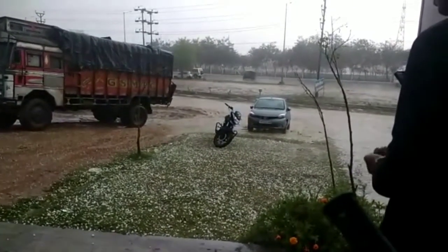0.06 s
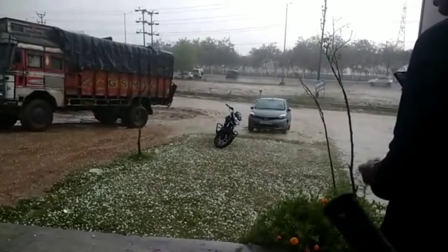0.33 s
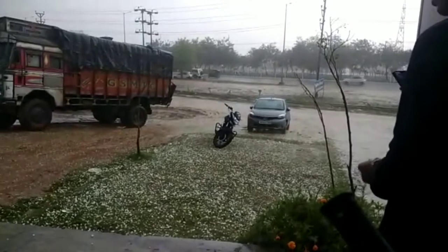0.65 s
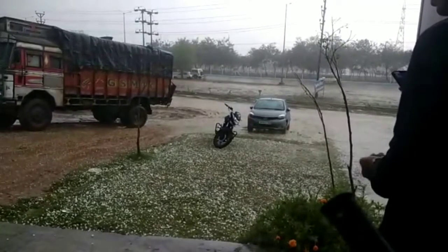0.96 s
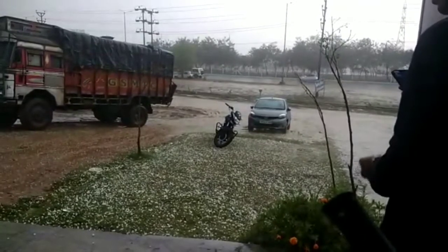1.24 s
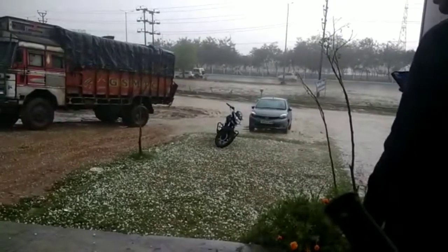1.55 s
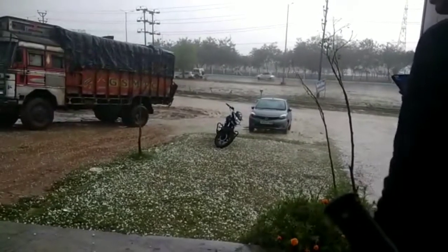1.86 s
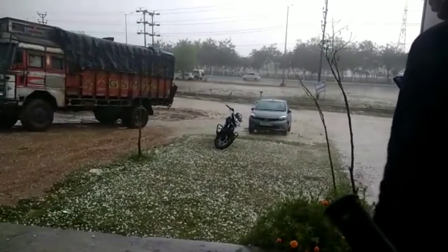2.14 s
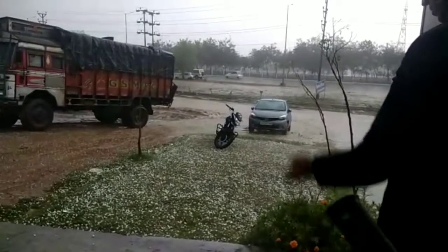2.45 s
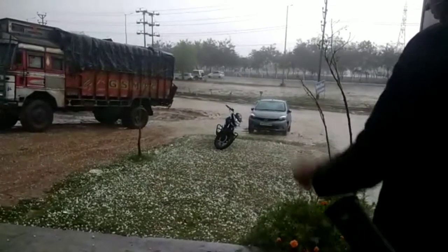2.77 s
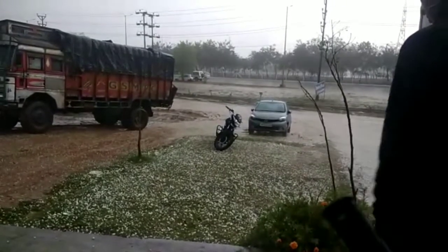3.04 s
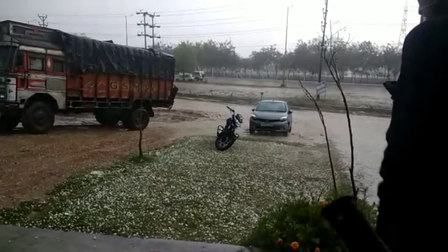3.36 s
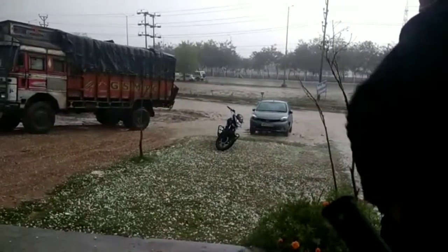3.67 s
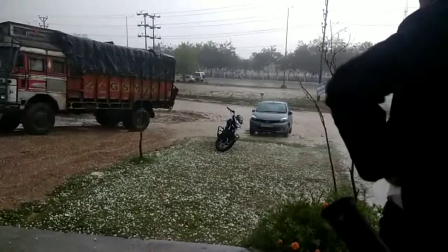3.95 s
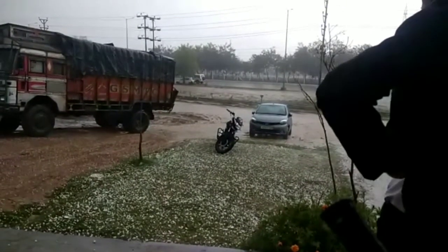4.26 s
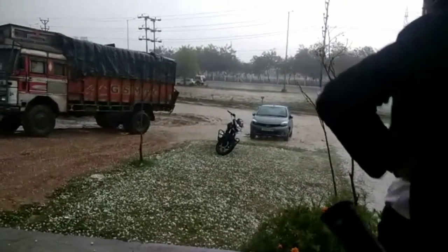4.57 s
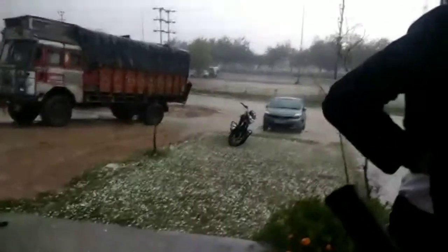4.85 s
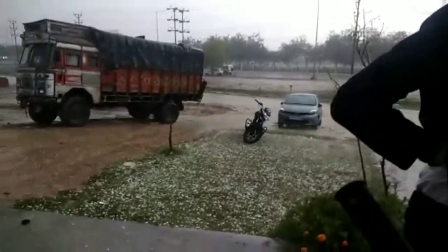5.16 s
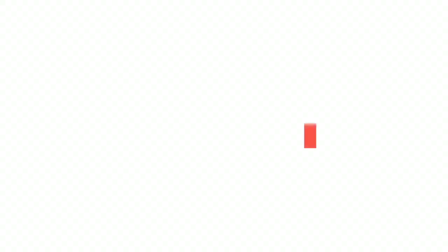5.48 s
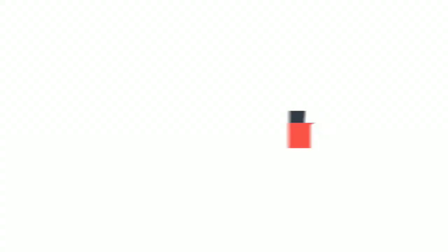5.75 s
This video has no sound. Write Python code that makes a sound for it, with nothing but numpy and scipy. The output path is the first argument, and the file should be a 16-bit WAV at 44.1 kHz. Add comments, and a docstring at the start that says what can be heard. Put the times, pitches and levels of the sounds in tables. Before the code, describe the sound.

A dense downpour of hail and rain drums on a porch roof and ticks on paving, with louder knocks and a metallic clank.

```python
"""A steady wash of heavy rain and hail, heard from under a porch roof open to a lawn and yard.
Stones drum on the roof in flurries, clatter on hard things nearby and tick on the paving.
Large ones stand out as clacks, tinks, knocks, bouncing runs, a sheet-metal clank and a hollow bonk:
decaying modes plus noise, smeared by the porch. The sound fades out at the end."""
import sys
import numpy as np
from scipy import signal
from scipy.fft import rfft, irfft, next_fast_len
from scipy.io import wavfile
from scipy.ndimage import uniform_filter1d, map_coordinates

SR = 44100
rng = np.random.default_rng(int(sys.argv[2]) if len(sys.argv) > 2 else 0)


def wav_out(sig):
    """Save sig, one row per channel (or a flat mono array), as 16-bit PCM at SR to the path in sys.argv[1]."""
    wavfile.write(sys.argv[1], SR, np.round(np.clip(np.atleast_2d(sig).T, -1, 1) * 32767).astype(np.int16))


N = 256220
TIME = np.arange(N) / SR
PORT_DELAY_S = 0.00047  # sound travel between the two microphone ports

# Spectrum of the fall. Each row: frequency in Hz, relative density in dB.
FALL_SPECTRUM = [(24, -57.5), (40, -24.5), (81, -21.5), (133, -3.5), (243, -3.5), (615, -5.5), (1040, -2),
                 (1630, -4), (2380, -3.5), (3220, -10.5), (3830, -11.5), (7730, -13.5), (10400, -17),
                 (13100, -15), (14800, -19), (16000, -39.5)]


def amp(db):
    """Decibels to gain."""
    return 10 ** (np.asarray(db) / 20)


def unit(x):
    """Scale to rms 1."""
    return x / np.sqrt(np.mean(x ** 2) + 1e-20)


def pan(db):
    """Stereo gains for a left-right difference."""
    return amp([[db / 2], [-db / 2]])


def decay(t, t60_s):
    """Exponential fall, 60 dB in t60_s."""
    return np.exp(-np.log(1000) * t / t60_s)


def sine(cycles):
    """Sine of a phase in cycles."""
    return np.sin(2 * np.pi * cycles)


def along(points, hz):
    """Interpolate (Hz, value) points on a log axis."""
    f, v = np.transpose(points)
    return np.interp(np.log(hz + 1), np.log(f + 1), v)


def filtered(x, response):
    """Apply the gain response(hz) by FFT."""
    n = x.shape[-1]
    m = next_fast_len(n + 4096)
    return irfft(rfft(x, m) * response(np.fft.rfftfreq(m, 1 / SR)), m)[..., :n]


def band(hz, low_hz, high_hz):
    """Band-pass gain; adjoining edges sum in power."""
    return 1 / np.sqrt((1 + (low_hz / (hz + 1)) ** 6) * (1 + (hz / high_hz) ** 6))


def bell(hz, centre_hz, octaves):
    """Gaussian resonance on a log axis."""
    return np.exp(-.5 * (np.log2((hz + 1) / centre_hz) / octaves) ** 2)


def wobble(rate_hz):
    """Smooth random curve."""
    return map_coordinates(rng.standard_normal(int(N * rate_hz / SR) + 4), [TIME * rate_hz])


def add(track, start_s, sound):
    """Mix a sound into the track."""
    part = track[:, round(start_s * SR):][:, :sound.shape[1]]
    part += sound[:, :part.shape[1]]


def diffuse(size):
    """White noise from all sides: alike at both ports in the bass, unrelated in the treble."""
    alike = lambda hz: np.sinc(2 * hz * PORT_DELAY_S)
    noise = rng.standard_normal((2, size))
    mid, side = filtered(noise, lambda hz: np.sqrt([1 + alike(hz), 1 - alike(hz)]))
    return unit(np.array([mid + side, mid - side]))


def burst(t, response):
    """Coloured diffuse noise as long as t; rms 1."""
    return unit(filtered(diffuse(len(t)), response))


def pelting(per_s, spread_db, contact_t60_s, porch_db, wash_db, porch_t60_s=.55):
    """Random impacts, their porch echo and the wash of far drops; white, rms 1."""
    start, size = rng.random((int(per_s * N / SR), 2)).T
    blows = np.bincount((start * N).astype(int), amp(spread_db * size) ** 2, N)
    dying = lambda t60_s: unit(np.sqrt(signal.lfilter([1], [1, -amp(-120 / (t60_s * SR))], blows)))
    energy = dying(contact_t60_s) ** 2 + (amp(porch_db) * dying(porch_t60_s)) ** 2 + amp(wash_db) ** 2
    return unit(np.sqrt(energy) * diffuse(N))


def pings(per_s, centre_hz, octaves, cycles, spread_db):
    """Stones and drops ringing briefly, each at its own pitch and place; rms 1."""
    count = int(per_s * N / SR)
    pitch, size, life, side = rng.standard_normal((count, 4)).T[..., None]
    hz = np.clip(centre_hz * 2 ** (octaves * pitch), 200, 15000)
    t = np.arange(int(SR * min(8 * cycles / centre_hz, .06))) / SR
    ring = amp(spread_db * np.tanh(size)) * np.exp(-t * hz / (cycles * 2 ** (life / 2))) * sine(hz * t)
    at = rng.integers(0, N, (count, 1)) + np.arange(len(t))
    lags = (rng.uniform(0, 1, (2, count, 1)) * PORT_DELAY_S * SR).astype(int)
    return unit(np.array([np.bincount((at + lag).ravel(), (ring * amp(way * side)).ravel(), N)[:N]
                          for lag, way in zip(lags, (2, -2))]))


def mottled(x, depth_db):
    """No two stones ring alike: narrow patches of spectrum swell and sink."""
    spectra = signal.stft(x, nperseg=1024)[2]
    patches = uniform_filter1d(rng.standard_normal(spectra.shape[1:]), size=3, axis=0)
    patches = unit(uniform_filter1d(patches, size=5, axis=1))
    return signal.istft(spectra * amp(depth_db * np.tanh(patches)), nperseg=1024)[1][:, :N]


def flurries_db(rise_s=.056, fall_s=.088):
    """Flurries drive hail onto the roof: each rises, holds and dies away."""
    # Each row: start in seconds, length in seconds, extra drumming in dB.
    flurries = [(-.15, 0.72, 1), (.9, 0.1, 2.5), (1.947, 1.13, 1.4), (3.135, 0.32, 2.5), (3.58, 0.18, 1.6)]
    rise = lambda s: np.clip((TIME - s) / rise_s, 0, 1)
    fall = lambda s: np.exp(-np.maximum(TIME - s, 0) / fall_s)
    return sum(db * rise(s) * fall(s + length_s) for s, length_s, db in flurries)


def surface_levels_db():
    """One storm strength drives roof, yard and paving; the roof also catches the flurries."""
    # Each row: time in seconds, strength in dB.
    storm = [(0, 2), (.5, 0.57), (1.1, 0.5), (1.35, -1.05), (1.62, 0.76), (2.4, 0), (3.25, 1.5), (3.9, 0),
             (4.6, 1.5), (5.1, 3.4)]
    strength_db = np.interp(TIME, *np.transpose(storm))
    lull_db = -6.5 * np.exp(-((TIME - 4.69) / .05) ** 2)  # the level dips briefly
    return (.38 * strength_db + lull_db + flurries_db(),
            1.1 * strength_db + lull_db / 2,
            .47 * strength_db + lull_db / 2)


def surface(x, low_hz, high_hz):
    """Shape x to one band of the fall's spectrum; rms 1."""
    return unit(filtered(x, lambda hz: amp(along(FALL_SPECTRUM, hz)) * band(hz, low_hz, high_hz)))


def roof(level_db):
    """Dense hail drums on the roof's low resonances."""
    # Each row: resonance in Hz, boost in dB.
    modes = [(135, 2), (252, 1.5), (325, 1.5), (400, 2.5)]
    boost = lambda hz: amp(sum(db * bell(hz, mode_hz, octaves=.053) for mode_hz, db in modes))
    drumming = pelting(per_s=420, spread_db=6, contact_t60_s=.025, porch_db=-6, wash_db=0)
    return amp(level_db - 24.5) * surface(filtered(drumming, boost), 122, 628)


def yard(level_db):
    """Midrange clatter on hard things; near stones patter and tap one by one."""
    clatter = pelting(per_s=330, spread_db=16, contact_t60_s=.012, porch_db=0, wash_db=6)
    clatter = mottled(surface(clatter, 700, 3600), depth_db=4)
    patter = pelting(per_s=60, spread_db=6, contact_t60_s=.016, porch_db=-7, wash_db=-30)
    patter = surface(patter, 1500, 6000)
    taps = pings(per_s=130, centre_hz=1990, octaves=.6, cycles=24, spread_db=3.5)
    mix = amp(-22) * clatter + amp(-31) * patter + amp(-30.5) * taps
    return amp(level_db + .4 * wobble(13)) * mix


def paving(level_db):
    """The hardest surface gives the shortest contacts: bright spatter, spray and ticks."""
    spatter = pelting(per_s=300, spread_db=20, contact_t60_s=.006, porch_db=4, wash_db=3)
    spatter = mottled(surface(spatter, 3640, 9000), depth_db=7.5)
    spray = pelting(per_s=330, spread_db=20, contact_t60_s=.004, porch_db=3, wash_db=4)
    spray = mottled(surface(spray, 9000, 18000), depth_db=4)
    tinkles = pings(per_s=110, centre_hz=4800, octaves=.5, cycles=24, spread_db=5)
    cracks = pings(per_s=48, centre_hz=9600, octaves=.37, cycles=3, spread_db=15.5)
    mix = amp(-23) * spatter + amp(-28.5) * spray + amp(-36) * tinkles + amp(-45) * cracks
    return amp(level_db + .22 * wobble(23)) * mix


def air_rumble():
    """Faint low noise of air."""
    return amp(-48.5) * unit(filtered(rng.standard_normal((2, N)), lambda hz: band(hz, 24, 110)))


def fittings(level_db):
    """Stray stones tick on two small hard things, the pitch varying slightly."""
    ticks = sum(pings(per_s=30, centre_hz=hz, octaves=.05, cycles=24, spread_db=3)
                for hz in (3790, 5360))
    return amp(level_db - 38.5) * ticks


def strikes(hits, octaves, contact_t60_s, contact_db, echo_t60_s, ring_db, main_db, crush_s=.0008):
    """Single large stones: noise, a main mode and five loose ones, dying into the porch echo."""
    out, t = np.zeros((2, N)), np.arange(SR // 3) / SR
    contact = amp(contact_db) * decay(t, contact_t60_s)
    echo = decay(t, echo_t60_s) * (1 - np.exp(-t / .0024))
    for start_s, db, pitch_hz, pan_db in hits:
        noise = burst(t, lambda hz: bell(hz, pitch_hz, octaves) * amp(along(FALL_SPECTRUM, hz)))
        modes_hz = pitch_hz * 2 ** (octaves * rng.uniform(-.5, .97, (5, 1, 1)))
        ring = unit(sine(modes_hz * t + rng.random((5, 2, 1))).sum(axis=0))
        main = unit(sine(pitch_hz * t + .5 * rng.random((2, 1))))
        onset = 1 - np.exp(-t / (crush_s + 1 / pitch_hz))  # crush time plus one cycle
        stone = unit(noise + amp(ring_db) * ring + amp(main_db) * main)
        add(out, start_s, amp(db) * pan(pan_db) * stone * onset * np.hypot(contact, echo))
    return out


def clacks():
    """The largest stones crack on the paving, barely pitched."""
    # Each row: start in seconds, relative level in dB, brightness in Hz, left-right in dB.
    hits = [(.012, -17, 7350, -0.5), (.307, -13, 10100, -0.5), (.46, -21.5, 10900, 3.5),
            (.532, -22.5, 6000, 0.5), (.62, -19, 7140, 3), (.922, -19, 6350, 0), (1.12, -15, 6900, 2),
            (1.527, -22.5, 9000, 6), (1.718, -14, 5130, 1), (1.847, -14.5, 7400, 4.5),
            (2.122, -18, 5400, 6), (2.72, -14.5, 4020, -9), (2.814, -22, 7050, 0), (3.116, -17, 7530, 4.5),
            (3.222, -17, 5630, 2.5), (3.68, -20, 6000, 2), (3.715, -19, 7000, 2), (4.05, -17, 4560, 3),
            (4.393, -16, 10000, 4), (4.649, -15, 10100, -1), (4.775, -15, 3740, -5), (4.857, -21, 9100, 12),
            (4.99, -16.5, 7750, 5), (5.055, -19, 10500, 8), (5.11, -14, 9500, 3)]
    return amp(1.4) * strikes(hits, octaves=.8, contact_t60_s=.024, contact_db=2, echo_t60_s=.14,
                              ring_db=-13, main_db=-22.5)


def tinks(half_width_hz=220):
    """Stones glance off small hard things: a rough mode cluster in a splash of water and ice."""
    # Each row: start in seconds, level in dB, pitch in Hz, left-right in dB.
    hits = [(.31, -18, 3770, -2), (0.619, -13, 3830, -6), (0.874, -16, 3840, -10), (2.126, -14, 3910, -11),
            (2.454, -18, 3670, -3), (2.722, -27, 3980, -1), (4.047, -21, 5170, 2), (4.061, -16, 6170, 0),
            (4.091, -19, 5260, -2), (4.259, -15, 3920, -3), (4.4, -17, 4130, -1), (4.65, -13, 5170, -1.5),
            (4.992, -19, 5400, -6), (5.062, -19, 3600, -3)]
    out, t = np.zeros((2, N)), np.arange(SR // 8) / SR
    onset = 1 - np.exp(-t / .002)
    envelope = decay(t, .065) * onset
    for start_s, db, pitch_hz, pan_db in hits:
        modes_hz = pitch_hz + half_width_hz * (np.linspace(-1, 1, 7) + rng.uniform(-.2, .2, 7))
        phases = rng.random((7, 1, 1)) + .5 * rng.random((7, 2, 1))
        cluster = sine(modes_hz[:, None, None] * t + phases).sum(axis=0)
        ring = unit(cluster * envelope) * np.sqrt(np.mean(envelope ** 2))
        splash = burst(t, lambda hz: bell(hz, pitch_hz, octaves=.5)) * decay(t, .06) * onset
        add(out, start_s, amp(db) * pan(pan_db) * (ring + amp(-7) * splash))
    return out


def knocks():
    """The largest stones knock on roof and fittings, with a clearer pitch."""
    # Each row: start in seconds, level in dB, pitch in Hz, left-right in dB.
    hits = [(.484, -16.5, 2375, -6.5), (.682, -15, 2316, 6.5), (.705, -19, 387, -1), (.72, -17, 2310, 0),
            (.727, -15, 750, -0.5), (.745, -18, 990, 0.5), (1.153, -18.5, 2580, 1),
            (1.632, -23.5, 1690, -4.5), (2.716, -19, 2430, -0.5), (3.118, -16, 2320, -2),
            (3.198, -16.5, 364, 0.5), (3.201, -15, 700, 1.5), (3.249, -23, 890, 3.5), (3.275, -18, 177, -1),
            (3.32, -19, 191, 1.5), (3.385, -17.5, 250, 0.5), (3.44, -19, 189, 0), (3.722, -18.5, 2270, 3),
            (3.89, -18.5, 350, -2.5), (3.975, -16, 140, 2.5)]
    return strikes(hits, octaves=.93, contact_t60_s=.022, contact_db=5, echo_t60_s=.18,
                   ring_db=-8.5, main_db=-5)


def bounces(gap_s=.017, high_hz=4000):
    """Stones bounce on wood: each contact rings nine modes and the porch answers."""
    # Each row: start in seconds, length in seconds, level in dB, lowest mode in Hz, left-right in dB.
    runs = [(0.484, .025, -15.5, 1120, -2), (0.68, .075, -22, 686, 0.5), (1.597, .042, -17, 1300, -1.5)]
    out, t = np.zeros((2, N)), np.arange(SR // 4) / SR
    for start_s, length_s, db, low_hz, pan_db in runs:
        for delay_s in np.arange(0, length_s, gap_s):
            modes_hz = np.geomspace(low_hz, high_hz, 9) * rng.uniform(.88, 1.12, 9)
            ring = unit(sine(modes_hz[:, None, None] * t + .5 * rng.random((9, 2, 1))).sum(axis=0))
            echo = burst(t, lambda hz: band(hz, low_hz, high_hz) ** 2)
            stone = ring * decay(t, .12) + amp(-7) * echo * decay(t, .22)
            contact_s = start_s + delay_s * rng.uniform(.85, 1.15)
            add(out, contact_s, amp(db + rng.uniform(-2, 2)) * pan(pan_db) * stone)
    return out


def struck_body(hits, modes, crash_hz, crash_db, crash_t60_s):
    """Ringing modes plus a crash blurred by reflections; each spot hit favours other modes."""
    out, t = np.zeros((2, N)), np.arange(SR // 3) / SR
    onset = 1 - np.exp(-t / .0025)
    for start_s, db, pan_db in hits:
        ring = np.zeros((2, len(t)))
        for mode_hz, mode_db, t60_s in modes:
            envelope = amp(mode_db + rng.uniform(-2, 2)) * decay(t, t60_s)
            ring += envelope * sine(mode_hz * t + rng.random() + .37 * rng.random((2, 1)))
        crash = burst(t, lambda hz: bell(hz, crash_hz, octaves=1)) * decay(t, crash_t60_s)
        add(out, start_s, amp(db) * onset * (pan(pan_db) * ring + amp(crash_db) * crash))
    return out


def clank():
    """A stone hits sheet metal and bounces once."""
    # Each row: start in seconds, level in dB, left-right of the ring in dB.
    hits = [(2.983, -8, 5), (3.008, -17, 3)]
    # Each row: mode in Hz, relative level in dB, t60 in seconds.
    sheet_modes = [(2140, -7, 0.053), (2335, 2, 0.073), (2580, -1, 0.046), (3900, -4.5, .086),
                   (5050, -6, .04), (8200, -8, 0.11)]
    return struck_body(hits, sheet_modes, crash_hz=2913, crash_db=-4.5, crash_t60_s=.15)


def bonk():
    """A stone rings something hollow."""
    # Each row: start in seconds, level in dB, left-right of the ring in dB.
    hits = [(3.508, -10, 2.5)]
    # Each row: mode in Hz, relative level in dB, t60 in seconds.
    hollow_modes = [(1504, -0.5, 0.091), (1590, -1, 0.032), (2030, -7.5, .05)]
    return struck_body(hits, hollow_modes, crash_hz=1600, crash_db=-2, crash_t60_s=.09)


def scene():
    """The downpour and its large stones."""
    roof_db, yard_db, paving_db = surface_levels_db()
    downpour = roof(roof_db) + yard(yard_db) + paving(paving_db) + air_rumble() + fittings(paving_db)
    return downpour + clacks() + tinks() + knocks() + bounces() + clank() + bonk()


def record(dry, ceiling=.8, end_s=5.222, fade_s=1.4, top_hz=16100):
    """Port colouring, soft clip, linear fade-out, steep low-pass."""
    # The two ports differ in colour. Each row: frequency in Hz, left-right in dB.
    port_balance = [(60, 9.5), (110, -2.5), (200, 1.5), (380, 0), (700, 0.5), (1290, 3), (2380, 4.5),
                    (4400, -0.5), (8120, 0), (15000, 13)]
    ports = lambda hz: np.sqrt(2 / (1 + amp(np.outer([-2, 2], along(port_balance, hz)))))
    coloured = filtered(dry, ports)
    rounded = coloured / (1 + np.abs(coloured / ceiling) ** 6) ** (1 / 6)
    fade = np.clip((end_s - TIME) / fade_s, 0, 1)
    return filtered(rounded * fade, lambda hz: 1 / (1 + (hz / top_hz) ** 250))


dry = scene()
out = record(dry)
wav_out(out)
```